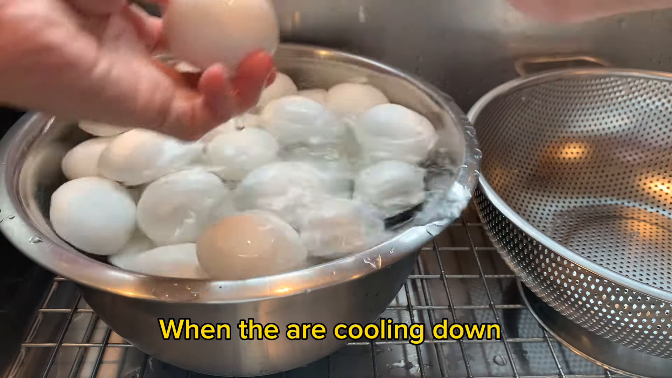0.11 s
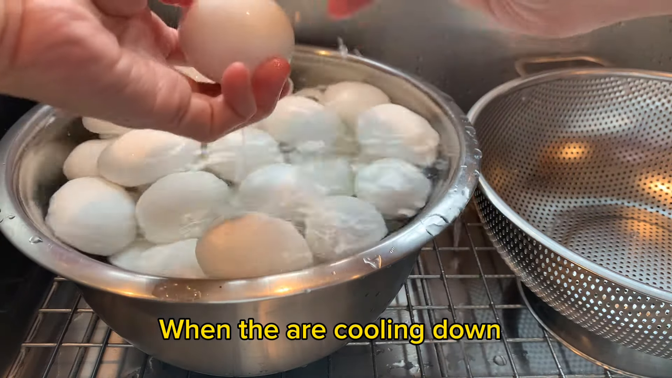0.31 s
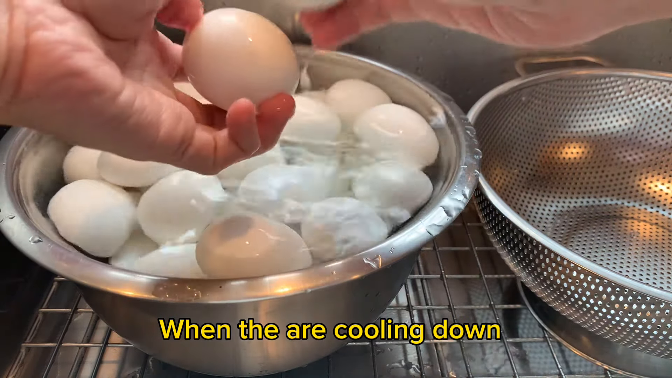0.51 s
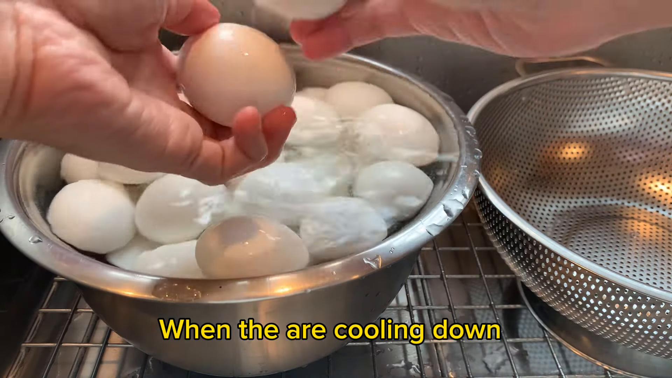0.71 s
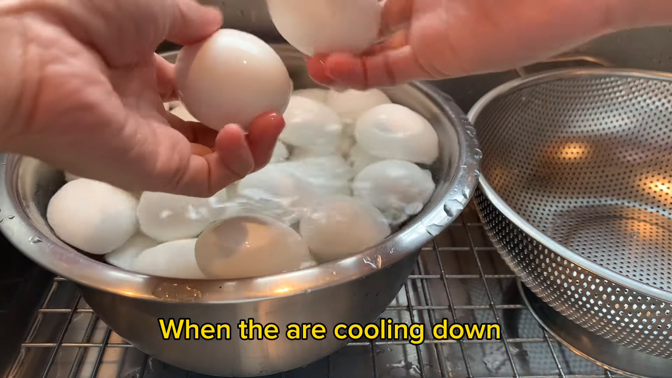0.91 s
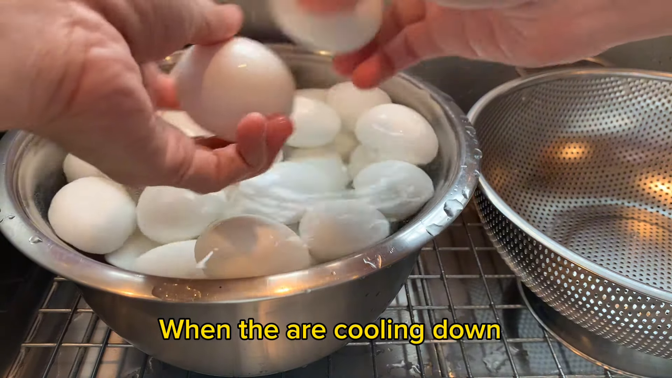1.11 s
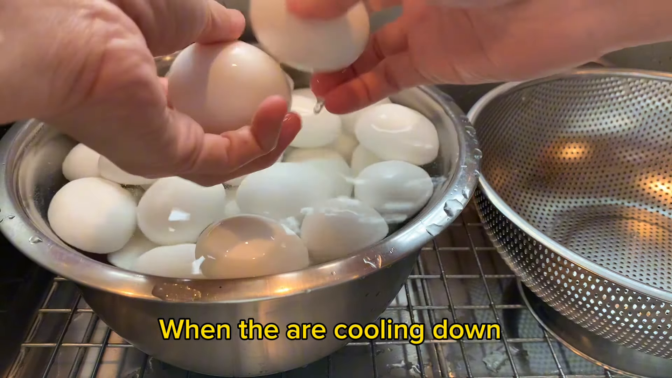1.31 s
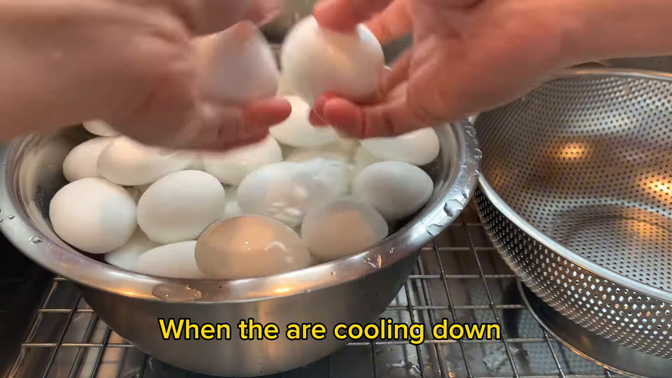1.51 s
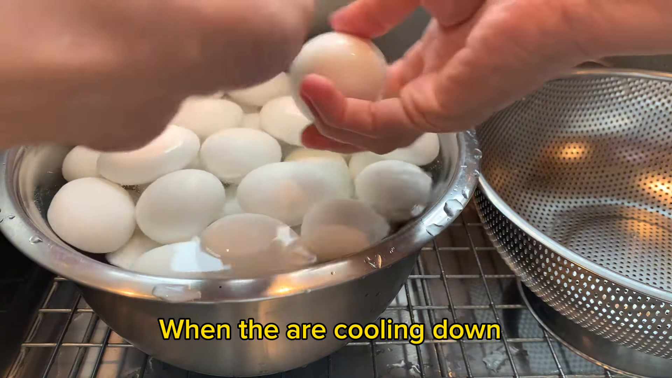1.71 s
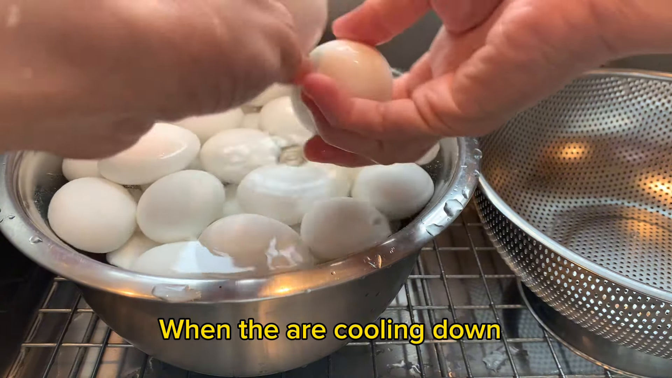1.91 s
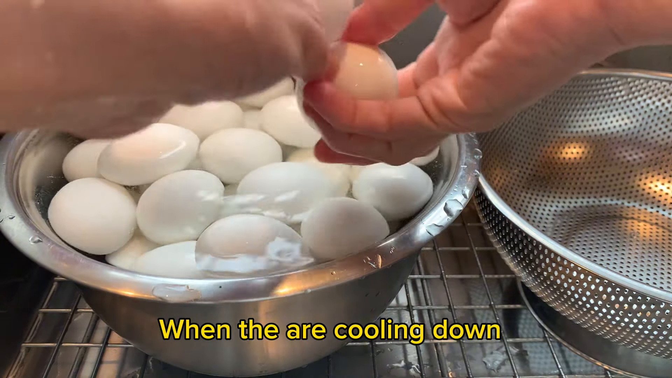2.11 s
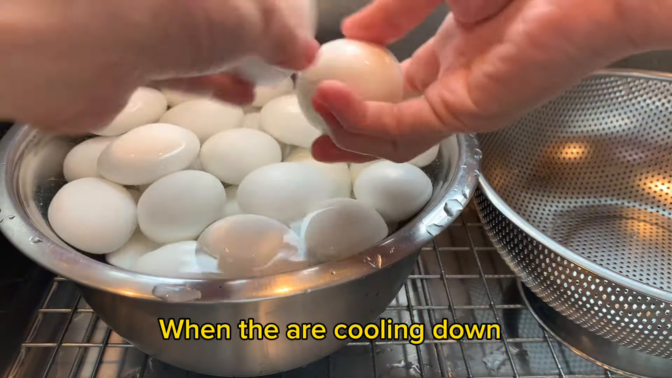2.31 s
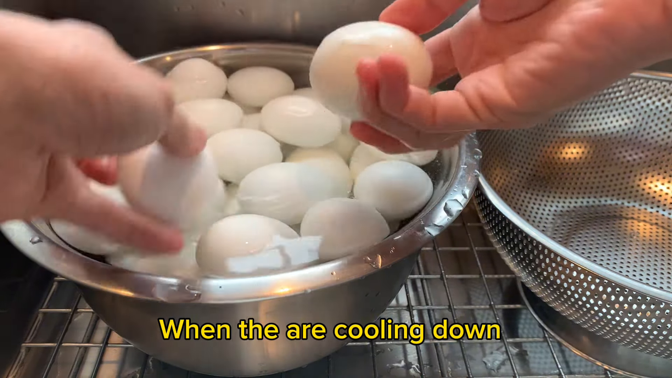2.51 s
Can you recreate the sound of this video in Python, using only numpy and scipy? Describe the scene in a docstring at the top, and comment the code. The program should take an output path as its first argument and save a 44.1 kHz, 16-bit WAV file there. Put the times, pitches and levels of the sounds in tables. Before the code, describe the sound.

Two boiled eggs knock together in nine crisp, crunchy cracks, the first hardest, over a bowl of water; brief slosh at the start, small wet ticks, short metallic sink echo, faint hum, close stereo phone.

```python
"""In a kitchen sink, two boiled eggs are tapped together above a steel bowl of water, close to a stereo phone.
Each tap is a burst of tiny shell fractures with a sharp snap, plus a hollow knock of two damped modes.
Wet ticks and finger rubs are softer fracture bursts; sink, bowl and room answer as echoes of the eggs.
Coloured noise and low gulps make the stirred water, which settles; hand thuds are short low rings.
Behind it lie an appliance's hum of wavering sine tones and the room's air noise."""
import sys
import numpy as np
from scipy import signal
from scipy.fft import rfft, irfft
from scipy.io import wavfile

SR = 44100
rng = np.random.default_rng(int(sys.argv[2]) if len(sys.argv) > 2 else 0)


def store_pcm(level_fs):
    """Save levels as 16-bit WAV."""
    pcm = np.round(np.clip(level_fs, -1, 1) * 32767).astype(np.int16)
    wavfile.write(sys.argv[1], SR, np.atleast_2d(pcm).T)


N = 112455  # samples

# The egg taps: (time [s], crunch and snap level [dB], build-up [ms], fade [ms], snap over crunch [dB],
# hard clack tone [dB], hollow mids tone [dB], knock pitch [Hz], knock level [dB],
# second knock pitch [Hz], second knock level [dB], extra shell level into the room [dB], left over right [dB])
TAP_TABLE = [(0.2031, 12, 1, 3.2, -6, 6, -4, 1955, -7.5, 1470, -19.5, 0.5, -0.5),
             (0.4319, 2.5, 2.6, 7.1, -12, -1, 2, 1940, -12.5, 551, -29, -1, 0),
             (0.6317, 3.5, 1.4, 3.7, 2, -0.5, 0, 1596, -21, 1985, -20, -1.5, -0.5),
             (1.041, -4.5, 4, 7, -5.5, -3.5, 6, 1020, -28.5, 1976, -25, 2.5, -0.5),
             (1.2540, 2, 1.54, 1.95, -3.5, -0.5, -3, 1085, -17, 1240, -16.5, 0.5, -0.5),
             (1.5938, -12, 1.2, 3.6, -9, -3.5, 8.5, 1035, -32.5, 1490, -33.5, 3.5, 0),
             (1.8625, 2.5, 2.26, 1.04, -4.5, -4, -1, 950, -18.5, 1580, -15.5, 1, 0),
             (2.0861, 2.5, 1.9, 2.25, -4.5, -3.5, -5, 1009, -13, 1666, -15, -3, 0),
             (2.2804, -3.5, 1.4, 8.3, -6, -5, -14, 1020, -16.5, 1370, -23, 3, .5)]
# How alike the echoes are left and right: (frequency [Hz], likeness [0-1])
ECHO_MATCH = [(300, 0.9), (1500, 0.2), (9000, 0), (12000, 0.91), (13500, 0.2), (15300, 0.97)]


def undb(db):
    """Turn decibels into a gain."""
    return 10 ** (np.asarray(db) / 20)


def curve(points, hz):
    """Read a table of (frequency, value) on a log-frequency axis."""
    p = np.array(points, float)
    return np.interp(np.log(np.maximum(hz, 1)), np.log(p[:, 0]), p[:, 1])


def gain_over_time(t, points):
    """Read a table of (time, level) as a gain that glides in decibels."""
    return undb(np.interp(t, *np.array(points).T))


def freqs(size):
    """List the frequencies in the spectrum of a sound of this length."""
    return np.fft.rfftfreq(size, 1 / SR)


def unit(x):
    """Scale each channel to an energy of 1."""
    return x / np.sqrt(np.sum(x ** 2, axis=-1, keepdims=True))


def fall(t, t60):
    """Die away by 60 dB in t60 seconds."""
    return np.exp(-np.log(1000) * t / t60)


def centred_time(size):
    """Times in seconds, with zero in the middle."""
    return (np.arange(size) - size // 2) / SR


def colour(x, gain):
    """Filter with a gain per frequency, moving the response after each event so nothing sounds early."""
    size = x.shape[-1]
    # folding the log spectrum's echo pattern onto positive times gives minimum phase
    pattern = irfft(np.log(gain), size)
    pattern[1:size // 2] *= 2
    pattern[size // 2 + 1:] = 0
    return irfft(rfft(x) * np.exp(rfft(pattern)), size)


def pair(size, likeness):
    """Make left and right white noise that share as much as the table says at each frequency."""
    alike = np.clip(curve(likeness, freqs(size)), 0, .995)
    mid, side = rfft(rng.standard_normal((2, size)))
    left_right_sign = np.array([[1], [-1]])
    return irfft(mid * np.sqrt(1 + alike) + side * np.sqrt(1 - alike) * left_right_sign, size)


def add(out, x, at, pan_db=0):
    """Mix a sound in, with its middle at the given time; pan_db is left over right."""
    start = int(at * SR) - len(x) // 2
    lo, hi = max(start, 0), min(start + len(x), N)
    sides = undb(np.array([[pan_db], [-pan_db]]) / 2)
    out[:, lo:hi] += x[lo - start:hi - start] * sides


def ring(t, hz, t60):
    """One damped mode: a sine that swells softly from time zero, then dies away."""
    u = np.maximum(t, 0)
    return unit(u * np.sin(2 * np.pi * hz * u) * fall(u, t60))


def fractures(t, rise_ms, fade_ms, evenness):
    """Tiny random snaps build up to time zero and die away; evenness (0-1) flattens their spectrum."""
    per_second, spread_db = 5000, 5
    hit = rng.random(len(t)) < per_second / SR
    size = rng.choice([-1, 1], len(t)) * undb(spread_db * rng.uniform(-1, 1, len(t)))
    ms = t * 1000
    shape = np.exp(-np.abs(ms / np.where(t < 0, rise_ms, fade_ms)) ** 1.3 / 2)
    burst = rfft(hit * size * shape)
    flatter = irfft(burst / (np.abs(burst) + 1e-9) ** evenness, len(t))
    return shape * flatter


def snap(t):
    """The main crack: the shell gives way at once at time zero, a very short burst with a flat spectrum."""
    rise_ms, fade_ms = .1, .3
    ms = t * 1000
    shape = np.exp(-np.abs(ms) / np.where(t < 0, rise_ms, fade_ms))
    burst = rfft(rng.standard_normal(len(t)) * shape)
    return unit(irfft(burst / (np.abs(burst) + 1e-9), len(t)))


def crunches(shell_tone, evenness, to_room=False, size=8192):
    """Every tap crushes shell: fractures and a snap, coloured by shell, hard clack and hollow mids."""
    # Hard clack of the shell: (frequency [Hz], share of the tap's clack tone)
    clack_share = [(900, -1), (2000, -0.87), (4000, 0.46), (6800, 0.7), (9000, -0.32), (13000, -0.47)]
    # Hollow mids: (frequency [Hz], share of the tap's mids tone)
    mids_share = [(1500, 0), (2800, 0.5), (4300, 0.53), (6000, 0)]
    out, t, f = np.zeros((2, N)), centred_time(size), freqs(size)
    for at, db, rise, fade, snap_db, clack_db, mids_db, *_, room_db, pan_db in TAP_TABLE:
        tone_db = curve(shell_tone, f) + clack_db * curve(clack_share, f) + mids_db * curve(mids_share, f)
        crack = unit(fractures(t, rise, fade, evenness)) + undb(snap_db) * snap(t)
        level = undb(db + to_room * room_db)
        add(out, level * unit(colour(crack, undb(tone_db))), at, pan_db)
    return out


def knocks(size=4096):
    """The hollow knock of the eggs' bodies: two heavily damped modes."""
    lead_s, t60_s = .0012, .013  # the knock starts just before the tap's time
    out, t = np.zeros((2, N)), centred_time(size) + lead_s
    for at, *_, hz, knock_db, second_hz, second_db, _, pan_db in TAP_TABLE:
        first = undb(knock_db) * ring(t, hz, t60_s)
        second = undb(second_db) * ring(t, second_hz, t60_s)
        add(out, first + second, at, pan_db)
    return out


def soft_bursts(events, tone, rise_ms, evenness, size=8192):
    """Fracture bursts of one colour, placed by a table of time, level and fade."""
    out, t = np.zeros((2, N)), centred_time(size)
    gain = undb(curve(tone, freqs(size)))
    for at, db, fade in events:
        burst = fractures(t, rise_ms, fade, evenness)
        add(out, undb(db) * unit(colour(burst, gain)), at)
    return out


def wet_ticks(evenness):
    """Small bright wet ticks between and after the taps: short fracture bursts."""
    # Ticks: (time [s], level [dB], fade [ms])
    tick_events = [(0.3476, -12.5, 1.1), (.3990, -25.5, 2.2), (1.6941, -28.5, 2.6), (1.7100, -29, 3.6),
                   (2.4700, -36.5, 0.68), (2.5347, -17.5, 0.84)]
    # Tick colour: (frequency [Hz], relative level [dB])
    tick_tone = [(300, -30), (3000, -23.5), (5000, -16), (9000, -6), (11000, -3.5), (12600, 0.5),
                 (14500, -2), (17000, -56)]
    return soft_bursts(tick_events, tick_tone, rise_ms=1, evenness=evenness)


def finger_rubs(evenness):
    """Fingers slide on wet shell: fracture bursts with a slower build-up."""
    # Rubs: (time [s], level [dB], fade [ms])
    rub_events = [(0.035, -30.5, 4.9), (0.142, -30, 41), (1.659, -37.5, 31)]
    # Rub colour: (frequency [Hz], relative level [dB])
    rub_tone = [(300, -14), (1500, 5), (3000, 3.5), (5000, 2), (8500, -7.5), (12000, -25), (17000, -29.5)]
    return soft_bursts(rub_events, rub_tone, rise_ms=8.2, evenness=evenness)


def shells(shell_tone, evenness, to_room=False):
    """All shell sounds along one path: crunches, wet ticks and finger rubs."""
    return crunches(shell_tone, evenness, to_room) + wet_ticks(evenness) + finger_rubs(evenness)


def thuds(t):
    """The hands take up the harder blows: short low rings."""
    # Thuds: (time [s], pitch [Hz], level [dB])
    thud_events = [(0.214, 62.1, -15.5), (2.085, 71.5, -22.5)]
    return sum(undb(db) * ring(t - at, hz, t60=.11) for at, hz, db in thud_events)


def sink_echo(t):
    """Quick sink reflections: fading noise after a short gap."""
    gap_s, t60_s, level_db = .002, .07, -7.5
    noise = pair(len(t), ECHO_MATCH)
    return undb(level_db) * unit(noise * fall(t, t60_s) * (t > gap_s))


def bowl_ring(t):
    """The steel bowl rings in damped modes, each with random phases left and right."""
    # Bowl modes: (pitch [Hz], level [dB], time to fall 60 dB [s])
    bowl_modes = [(1100, -40, 0.2), (5400, -37, 0.14), (6400, -35, 0.25), (7200, -38, 0.15),
                  (7960, -43, 0.2), (9800, -39, 0.1), (12700, -33, 0.06)]
    out = 0
    for hz, db, t60 in bowl_modes:
        wave = np.sin(2 * np.pi * (hz * t + rng.random((2, 1))))
        out = out + undb(db) * unit(wave * fall(t, t60))
    return out


def room_tail(t):
    """The room's echo: noise that builds up quickly, then fades at its own pace in each band."""
    # Room echo: (frequency [Hz], time to fall 60 dB [s])
    room_fade = [(500, 0.58), (2000, 0.51), (6000, 0.48), (10000, 0.39), (15000, 0.21)]
    build_s, level_db = .004, -12.5
    size = len(t)
    f, noise, tail = freqs(size), rfft(pair(size, ECHO_MATCH)), 0
    edges_hz = [1, 700, 1500, 3000, 5000, 8000, 11000, 14000, 23000]
    for lo, hi in zip(edges_hz, edges_hz[1:]):
        band = irfft(noise * ((f >= lo) & (f < hi)), size)
        tail = tail + band * fall(t, curve(room_fade, np.sqrt(lo * hi)))
    return undb(level_db) * unit(tail * (1 - np.exp(-t / build_s)))


def kitchen(to_phone, to_sink, to_room, size=32768):
    """Join the direct sound with the answers of sink, bowl and room, by convolution."""
    t = np.arange(size) / SR

    def through(x, response):
        return signal.fftconvolve(x, response, axes=1)[:, :N]

    near = through(to_sink, sink_echo(t) + bowl_ring(t))
    return to_phone + near + through(to_room, room_tail(t))


def ports(x):
    """The treble reaches the left port later; the bass reaches both together."""
    lag_s, lag_starts_hz, lag_full_hz = .000295, 1386, 2035
    f = freqs(N)
    lag = lag_s * np.interp(f, (lag_starts_hz, lag_full_hz), [0, 1])
    left = irfft(rfft(x[0]) * np.exp(-2j * np.pi * f * lag), N)
    return np.array([left, x[1]])


def rush(tone):
    """Steady stereo noise of a given colour, at an rms of 1."""
    # How alike left and right are: (frequency [Hz], likeness [0-1])
    noise_match = [(120, 0.85), (300, 0.5), (1000, 0), (4000, .05)]
    spectrum = rfft(pair(N, noise_match)) * undb(curve(tone, freqs(N)))
    return np.sqrt(N) * unit(irfft(spectrum, N))


def water(t):
    """Stirred water: two noises, wash and deep slosh, rise and settle; damped low tones are its gulps."""
    # Colours of wash and slosh: (frequency [Hz], relative level [dB])
    wash_tone = [(60, -7), (120, 0.5), (250, 0), (480, -5), (700, -12), (1500, -14), (2500, -21.5),
                 (6000, -27.5), (12000, -38.5), (17000, -53.5)]
    slosh_tone = [(30, -27.5), (70, 14), (125, 15), (180, 1), (400, -20.5), (2000, -114)]
    # Loudness of wash and slosh: (time [s], level [dB])
    wash_level = [(0, -52), (0.038, -51), (0.1, -63.5), (.145, -55), (0.19, -51), (.3, -64), (.5, -61.5),
                  (.9, -71.5)]
    slosh_level = [(0, -55), (.15, -55), (.24, -65), (.32, -58), (.38, -54), (.45, -56), (.7, -67)]
    # Gulps of water between the eggs: (time [s], pitch [Hz], level [dB], time to fall 60 dB [s])
    gulp_events = [(.002, 439, -26, .06), (.006, 527, -24.5, 0.075), (.008, 200, -21.5, 0.053),
                   (.012, 93.1, -14, 0.13), (.025, 315.6, -22.5, 0.069), (0.063, 142, -19.5, 0.056),
                   (0.117, 131.8, -20, .1), (.165, 290, -26, 0.034), (0.353, 121, -16.5, 0.11),
                   (2.495, 131, -27, 0.12)]
    wash = rush(wash_tone) * gain_over_time(t, wash_level)
    slosh = rush(slosh_tone) * gain_over_time(t, slosh_level)
    gulps = sum(undb(db) * ring(t - at, hz, t60) for at, hz, db, t60 in gulp_events)
    return wash + slosh + gulps


def waver(t):
    """Drift in straight lines between independent random values, one every tenth of a second."""
    step_s = .1
    knots = np.arange(0, t[-1] + step_s, step_s)
    return np.interp(t, knots, rng.standard_normal(len(knots)))


def appliance(t):
    """An appliance hums: sine tones that waver separately and ease together toward the end."""
    # Hum tones: (pitch [Hz], rms level before waver and easing [dB])
    hum_tones = [(59.2, -57), (89, -75.5), (129.4, -64.5), (414.5, -76.5), (532.9, -72)]
    # Easing of the whole hum: (time [s], level [dB])
    hum_level = [(0, 0), (2.1, -2), (2.3, -4.5)]
    waver_db, hum = 1.3, 0
    for hz, db in hum_tones:
        loudness = np.sqrt(2) * undb(db + waver_db * waver(t))
        hum = hum + loudness * np.sin(2 * np.pi * (hz * t + rng.random()))
    return gain_over_time(t, hum_level) * hum


def room_air(t):
    """The room's air noise: a low-heavy rush that eases toward the end."""
    # Air colour: (frequency [Hz], relative level [dB])
    air_tone = [(20, 6), (40, 10.5), (58, 27.5), (75, 11.5), (100, 13.5), (130, 14), (170, 5.5), (300, 5),
                (500, 12), (750, 3.5), (1100, 6.5), (2000, -1), (2800, -11.5), (6000, -14), (14000, -22),
                (17000, -25)]
    # Air loudness: (time [s], rms level [dB])
    air_level = [(0, -64.5), (1.9, -64), (2.4, -67.5)]
    return gain_over_time(t, air_level) * rush(air_tone)


def scene():
    """Eggs in the kitchen, with hand thuds, water, hum and air behind them."""
    # Shell colour, straight to phone and sink: (frequency [Hz], relative level [dB])
    shell_tone = [(200, -22.5), (600, -25), (1200, -16), (2000, -8), (2800, -16.5), (4200, -7), (4900, 6),
                  (5700, -8), (6600, -3.5), (8000, 0), (10500, -0.5), (12100, -2), (12900, 3), (14000, -2),
                  (15300, -7), (17000, -23.5)]
    # Shell colour as it spreads through the room: (frequency [Hz], relative level [dB])
    spread_tone = [(200, -24), (1000, -14), (2000, -7.5), (3000, -10), (5000, -2), (7000, -2.5),
                   (10500, -0.5), (12100, 1), (13200, 5.5), (14300, 3), (15300, -16), (17000, -30)]
    t, body = np.arange(N) / SR, knocks()
    to_phone = shells(shell_tone, evenness=.2) + body
    # the hands shield the knock from sink and room
    to_sink = shells(shell_tone, evenness=.6) + undb(-3) * body
    # the room gathers the shell's sound from all directions, so more evenly
    to_room = shells(spread_tone, evenness=.9, to_room=True) + undb(-6) * body
    eggs = ports(kitchen(to_phone, to_sink, to_room))
    return eggs + thuds(t) + water(t) + appliance(t) + room_air(t)


def record(dry):
    """The phone rounds the loudest peaks and cuts the top of the treble."""
    ceiling, top_hz = .75, 16300
    rounded = ceiling * np.tanh(dry / ceiling)
    treble_cut = signal.ellip(8, .2, 70, top_hz, fs=SR, output="sos")
    return signal.sosfilt(treble_cut, rounded)


dry = scene()
out = record(dry)
store_pcm(out)
```